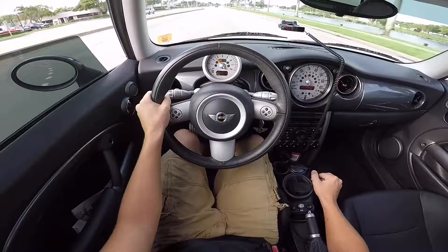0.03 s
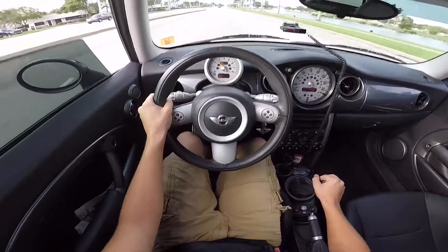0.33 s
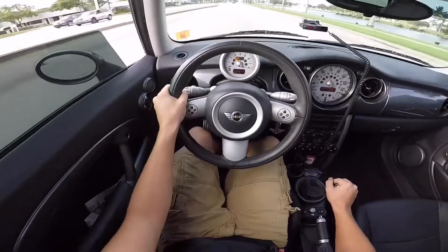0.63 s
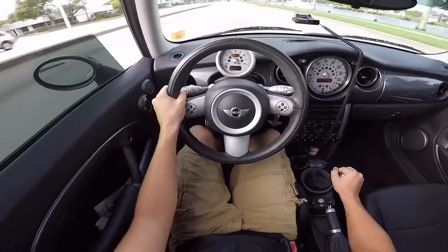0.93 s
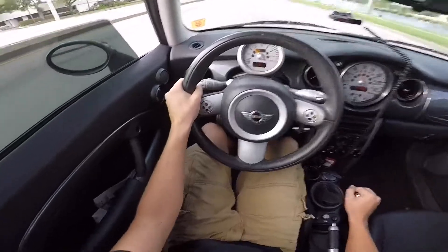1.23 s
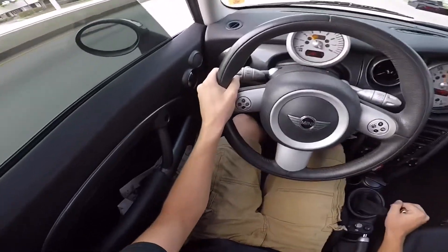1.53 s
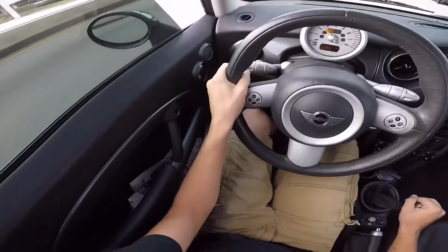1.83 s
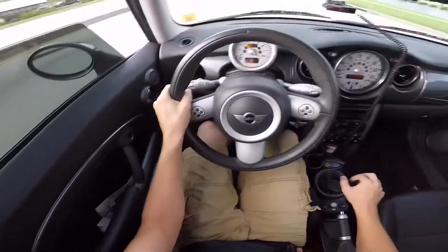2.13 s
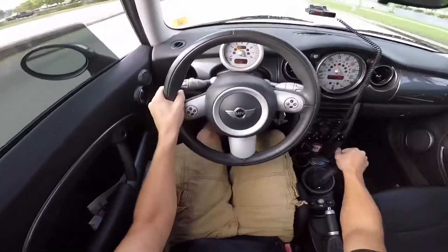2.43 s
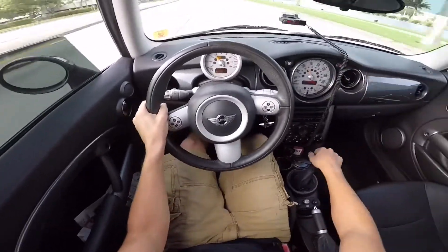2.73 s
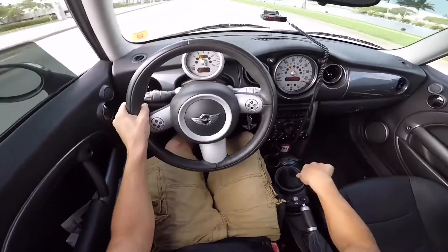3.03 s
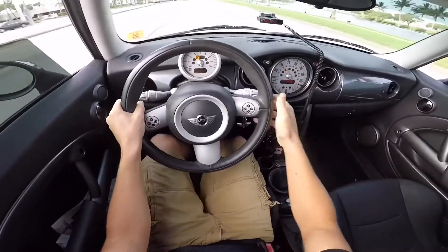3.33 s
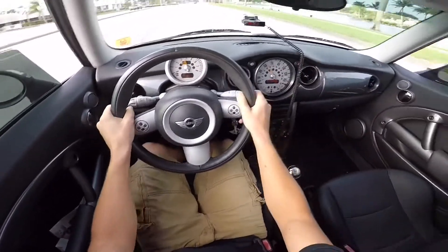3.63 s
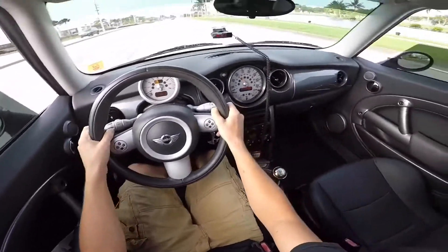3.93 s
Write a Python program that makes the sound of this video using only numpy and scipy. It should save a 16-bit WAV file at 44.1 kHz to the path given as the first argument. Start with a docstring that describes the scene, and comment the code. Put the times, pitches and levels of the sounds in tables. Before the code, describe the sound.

Heard inside the cabin, a car engine cruises with a faint whine and road noise. After light clicks from the controls, it rises in pitch in surges, with two dull knocks, ending in a booming, rasping exhaust.

```python
"""Inside a small four-cylinder car.

The periodic firing of the engine drives a harmonic series through the exhaust: a drone over
road rumble, tyre roar and wind. The engine picks up, eases off twice, then pulls with a deep
boom and a rasp on every firing. The transmission whines faintly while cruising, the controls
give a few small clicks, and two dull knocks sound as the load comes on and off."""
import sys
import numpy as np
from scipy import signal
from scipy.fft import rfft, irfft
from scipy.io import wavfile
from scipy.ndimage import uniform_filter1d, minimum_filter1d

SR = 44100
rng = np.random.default_rng(int(sys.argv[2]) if len(sys.argv) > 2 else 0)


def bounce(signal):
    """Save signal as a 16-bit WAV file at the path given by the first command-line argument."""
    frames = np.transpose(np.atleast_2d(signal))
    limited = np.clip(frames, -1, 1)
    pcm = np.round(limited * 32767).astype(np.int16)
    wavfile.write(sys.argv[1], SR, pcm)


N = 176400
T = np.arange(N) / SR

# Stereo balance of the engine sound. Each row: frequency in Hz, left minus right in dB.
ENGINE_PAN = [(85, 0.5), (122, 3.5), (165, 3.5), (250, 7), (300, 5), (490, 4), (620, 7), (740, 0.5),
              (870, -8), (1400, -5), (2000, -1.5), (3000, -1.5)]


def exhaust_boom(firings, firing_hz):
    """Forced vibration: the lowest firing harmonics swell as they cross cabin resonances."""
    # Boom in the cabin. Each row: time in seconds, levels of harmonics 1 to 4 in dB.
    harmonic_levels = [(0.25, -22.5, -22, -31, -25.5), (0.55, -33, -20.5, -19.5, -30.5),
                       (0.8, -22, -16.5, -21.5, -29.5), (1.1, -44, -20, -20.5, -26.5),
                       (1.7, -35, -17.5, -28, -24.5), (2.1, -23, -15.5, -24, -20.5),
                       (2.38, -56, -22, -29, -29), (2.5, -15.5, -21.5, -14, -31),
                       (2.7, -19.5, -19, -8.5, -33), (2.87, -32.5, -14, -20.5, -32),
                       (3, -15.5, -20.5, -10, -40), (3.12, -5.5, -57, -28, -19),
                       (3.27, -11.5, -26.5, -23, -34.5), (3.4, -10, -34, -49, -25),
                       (3.52, -10, -21, -36.5, -16.5), (3.7, -8, -20.5, -34, -15.5),
                       (3.87, -12, -15, -32, -18.5), (4, -12, -16.5, -26, -23)]
    # Tones of unequal cylinders. Each row: multiple of the crank rate, relative level in dB.
    crank_orders = [(3, -38.5), (5, -33.5), (7, -38.5), (10, -42.5)]
    # Unevenness, strongest at light load. Each row: time in seconds, gain in dB.
    unevenness = [(.15, 1), (2.1, 3.5), (2.45, 8), (2.7, -4), (3.05, -2.5), (4, -27)]
    uneven, out = amp(curve(unevenness)), 0
    for k in range(1, 5):
        waver = 1 + .05 * uneven * (drift(hz=15) + 1j * drift(hz=15))
        wave = waver * np.exp(2j * np.pi * k * firings)
        out += pan_tone(amp(curve(harmonic_levels, column=k)) * wave, k * firing_hz)
    crank_turns, crank_hz = firings / 2, firing_hz / 2  # two firings per revolution
    for order, db in crank_orders:
        waver = 1 + .94 * (drift(hz=12) + 1j * drift(hz=34))
        wave = waver * np.exp(2j * np.pi * (order * crank_turns + rng.random()))
        out += pan_tone(amp(db) * uneven * wave, order * crank_hz)
    return out


def exhaust_buzz(firings, firing_hz):
    """Superposition: upper harmonics leave the pipe loosely in phase, so each firing stands out."""
    # Pipe spectrum at full speed and 0 dB load. Each row: frequency in Hz, harmonic level in dB.
    pipe_spectrum = [(430, -27.5), (530, -20), (595, -36), (640, -37.5), (740, -29), (870, -32),
                     (1000, -37.5), (1100, -38.5), (1220, -37), (1350, -31), (1480, -36), (1600, -33),
                     (1720, -38), (1830, -47), (1960, -38), (2080, -44), (2200, -46), (2400, -55),
                     (3100, -50.5), (3400, -56), (4100, -50.5), (5000, -64)]
    # How hard the engine pulls. Each row: time in seconds, gain in dB.
    load = [(.15, -23.5), (2.42, -19), (2.52, -2.5), (2.62, -2), (2.72, -2.5), (2.88, -14), (2.98, -7),
            (3.05, 1), (3.11, 5), (3.19, -2.5), (3.33, -20.5), (3.44, -4.5), (3.6, 3.3), (3.8, 3.5), (4, 2)]
    # Roughness of the harmonics. Each row: time in seconds, random part of the amplitude, 0 to 1.
    roughness = [(.15, .7), (2.4, .55), (2.6, .3), (3.1, .35), (3.3, .45), (3.5, .1), (4, .1)]
    full_speed_hz, dull_above_hz, scatter_cycles = 121, 1000, .65
    speed_lost = np.clip(1 - firing_hz / full_speed_hz, 0, .1)
    dull_db_per_octave = 50 * speed_lost
    rough, out = curve(roughness), 0
    for k in range(5, 36):
        hz = k * firing_hz
        waver = np.sqrt(1 - rough ** 2) + rough * (drift(hz=27) + 1j * drift(hz=21)) / np.sqrt(2)
        octaves_above = np.log2(np.maximum(hz / dull_above_hz, 1))
        gain = amp(at_hz(pipe_spectrum, hz) - dull_db_per_octave * octaves_above)
        wave = np.exp(2j * np.pi * (k * firings + scatter_cycles * rng.random()))
        out += pan_tone(gain * waver * wave, hz)
    return out * amp(curve(load))


def exhaust_gas(firings):
    """Amplitude modulation: a puff at each firing pulses a growl, a rasp and thin metallic rings."""
    # Gas noise, mid growl and treble rasp. Each row: frequency in Hz, relative density in dB.
    growl_spectrum = [(100, -23.5), (250, -19.5), (450, 8.5), (800, 4), (1400, 6), (1900, -11),
                      (2600, -21.5), (5000, -55)]
    rasp_spectrum = [(1000, -15.5), (1900, -2), (2400, -9), (3100, -4.5), (3350, -5), (3800, -5),
                     (4200, -4.5), (4600, -8.5), (6200, -12.5), (8000, -22.5), (10000, -36.5), (12600, -49)]
    # Their strength. Each row: time in seconds, level in dB.
    growl_level = [(.15, -44), (.9, -34), (1.4, -46.5), (2.4, -30), (2.52, -23), (2.7, -53), (2.95, -51),
                   (3.03, -22), (3.085, -18.5), (3.15, -19), (3.2, -27.5), (3.35, -32), (3.6, -27),
                   (4, -33)]
    rasp_level = [(.15, -44), (2.44, -43), (2.52, -32.5), (2.62, -34.5), (2.72, -45), (2.96, -46.5),
                  (3.04, -29.5), (3.15, -29), (3.24, -42.5), (3.38, -57), (3.52, -36.5), (3.6, -28),
                  (3.75, -27.5), (4, -30)]
    # Metal resonances that sing under load. Each row: peak time in seconds, 1/e half-width in
    # seconds, frequency in Hz, level in dB.
    rings = [(3.09, .09, 2700, -42), (3.53, .09, 2690, -40), (3.64, .09, 3855, -37), (3.63, .08, 4135, -37),
             (3.71, .09, 4250, -38.5), (3.88, .075, 3095, -34), (3.95, .05, 2740, -40.5)]
    steady_flow, decay_cycles = 1, .45
    flutter_hz, flutter_db, ring_wander_hz = 15.2, 1.1, 14
    puffs = unit_rms(steady_flow + np.exp(-(firings % 1) / decay_cycles))
    growl = noise(growl_spectrum, coherence=[(300, .66), (1200, .057)], pan=ENGINE_PAN, gate=puffs)
    flutter = amp(flutter_db * np.sin(2 * np.pi * flutter_hz * T + .6 * drift(hz=2.4)))
    rasp = noise(rasp_spectrum, coherence=[(2000, .88), (4000, .45), (7000, .1)], gate=puffs * flutter)
    out = growl * amp(curve(growl_level)) + rasp * amp(curve(rasp_level))
    for peak_s, width_s, hz, db in rings:
        cycles = np.cumsum(hz + ring_wander_hz * drift(hz=70)) / SR
        swell = amp(db) * np.exp(-((T - peak_s) / width_s) ** 2)
        out += pan_tone(swell * puffs * flutter * np.exp(2j * np.pi * cycles), hz)
    return out


def road_and_wind():
    """Random excitation: the road shakes the body, the tyres roar, their tread sings, wind hisses."""
    # Spectra of the four noises. Each row: frequency in Hz, relative density in dB.
    rumble_spectrum = [(8, -44.5), (18, -9), (26, 3), (37, 6.5), (52, -0.5), (70, -5.5), (110, -25),
                       (300, -78.5)]
    roar_spectrum = [(20, -15), (60, -14.5), (110, 5), (230, 1.5), (300, 1.5), (370, -7), (500, -6),
                     (640, -12), (900, -9.5), (1300, -12.5), (1700, -16.5), (2400, -27), (4000, -60.5)]
    tread_spectrum = [(700, -27.5), (1030, 0.5), (1120, -6.5), (1240, 6.5), (1380, -15), (1900, -50.5)]
    wind_spectrum = [(1200, -20.5), (2400, 5), (4000, -1), (6400, -1), (8000, -9.5), (10000, -23),
                     (12600, -42)]
    # Their strength. Each row: time in seconds, level in dB.
    rumble_level = [(.15, -17), (.95, -15), (1.08, -12.5), (1.25, -15), (2, -17.5), (2.3, -14), (2.6, -19),
                    (3, -19), (3.2, -24), (3.5, -27.5), (4, -32)]
    roar_level = [(.15, -17.5), (2, -17.5), (2.35, -17), (2.55, -21), (2.85, -19.5), (3.1, -21.5),
                  (3.35, -25.5), (4, -26)]
    tread_level = [(.15, -34), (1, -32), (1.6, -47), (3, -49)]
    wind_level = [(.15, -38), (2.45, -39), (2.8, -42.5), (3.35, -44.5)]
    # Sound field of tyres and wind. Each row: frequency in Hz, left-right coherence from 0 to 1.
    coherence = [(60, .94), (130, .98), (300, .95), (600, .5), (1200, .2), (2600, .35), (5600, .22),
                 (11000, 0)]
    # Its balance. Each row: frequency in Hz, left minus right in dB.
    pan = [(60, -5), (110, 7), (190, 5), (350, 5), (630, 2.5), (1140, -5.5), (2060, 1), (3700, -3),
           (6700, 1)]
    # Its phase difference. Each row: frequency in Hz, lead of the left side in radians.
    lead = [(30, 0), (300, -.2), (600, -.9), (1200, -3.6), (1750, -5.2), (2800, -6.2), (6000, -6)]
    rumble = noise(rumble_spectrum, coherence=[(30, .89)]) * amp(curve(rumble_level))
    roar = noise(roar_spectrum, coherence, pan, lead) * amp(curve(roar_level))
    tread = noise(tread_spectrum, coherence, pan, lead) * amp(curve(tread_level))
    wind = noise(wind_spectrum, coherence, pan, lead) * amp(curve(wind_level))
    flicker = amp(.5 * drift(hz=11) + .76 * drift(hz=130))
    return rumble + (roar + tread + wind) * flicker


def clicks_and_knocks():
    """Damped impacts: exponentially decaying noise bursts take the colour of the body struck."""
    # Clicks of the controls and knocks as the load comes on and off.
    # Each row: start in seconds, level in dB, time to fall 60 dB in seconds.
    clicks = [(2.149, -28, 0.099), (2.163, -30, 0.054), (2.36, -27, 0.07), (2.886, -30, 0.11),
              (3.319, -29, 0.089)]
    knocks = [(2.477, -23.5, 0.099), (2.805, -24, 0.026)]
    # Responses of the bright plastic and the dull body. Each row: frequency in Hz, relative gain in dB.
    click_body = [(800, -19), (2000, -8), (2800, 4.5), (3100, -7), (3500, 4), (4600, -3), (5300, -0.5),
                  (5800, -3.5), (7000, -9), (9000, -28), (12600, -42)]
    knock_body = [(150, -19), (570, 4.5), (900, -7.5), (1500, -13), (3000, -25.5), (9000, -47)]
    out = 0
    for impacts, body in (clicks, click_body), (knocks, knock_body):
        envelope = 0
        for start, db, t60 in impacts:
            envelope += (T >= start) * amp(db - 60 * np.maximum(T - start, 0) / t60)
        rms = np.sqrt(np.mean(envelope ** 2))
        out += rms * noise(body, coherence=[(3000, .63)], gate=envelope)
    return out


def transmission_whine(firings, firing_hz, ratio=7):
    """Synchronous vibration: a thin tone keeps a constant ratio to the firing rate."""
    # Strength of the whine. Each row: time in seconds, level in dB.
    whine_level = [(.15, -37), (.7, -37.5), (1.3, -42), (2.3, -56)]
    wave = np.exp(2j * np.pi * ratio * firings)
    return pan_tone(amp(curve(whine_level)) * wave, ratio * firing_hz)


def pan_tone(wave, hz):
    """Interaural differences: a complex tone takes a level and phase on each side by its frequency."""
    # Phase difference of the engine tones. Each row: frequency in Hz, lead of the left in radians.
    lead = [(100, .27), (170, .05), (250, -.3), (330, -.3), (490, -1.2), (610, -2.1), (740, -1.3),
            (870, -2.2), (1500, -1.6), (2500, -.5), (4000, -.3)]
    side = amp(at_hz(ENGINE_PAN, hz) / 2) * np.exp(.5j * at_hz(lead, hz))
    return np.sqrt(2) * np.array([(wave * side).real, (wave / side).real])


def noise(spectrum, coherence, pan=((1, 0),), lead=((1, 0),), gate=1):
    """Partial coherence: two gated noises mix and filter to stereo of rms 1; tables run over Hz."""
    hz = np.fft.rfftfreq(N, 1 / SR)
    left, independent = rfft(gate * rng.standard_normal((2, N)))
    shared = at_hz(coherence, hz)
    right = shared * left + np.sqrt(1 - shared ** 2) * independent
    right *= np.exp(-1j * at_hz(lead, hz))
    tilt = amp(at_hz(pan, hz) / 2)
    stereo = np.array([left * tilt, right / tilt])
    return unit_rms(irfft(stereo * amp(at_hz(spectrum, hz)), N))


def drift(hz):
    """Low-pass noise: a random fluctuation of rms 1, with rates up to about hz."""
    low_pass = np.exp(-(np.fft.rfftfreq(N, 1 / SR) / hz) ** 2)
    return unit_rms(irfft(rfft(rng.standard_normal(N)) * low_pass, N))


def curve(rows, column=1):
    """Linear interpolation of one column of a time table at every sample."""
    rows = np.array(rows)
    return np.interp(T, rows[:, 0], rows[:, column])


def at_hz(rows, hz):
    """Interpolation of a table on a logarithmic frequency axis."""
    row_hz, values = np.transpose(rows)
    return np.interp(np.log(hz + 1), np.log(row_hz + 1), values)


def amp(db):
    """Decibels to amplitude ratio."""
    return 10 ** (np.asarray(db) / 20)


def unit_rms(x):
    """Normalisation to rms 1."""
    return x / np.sqrt(np.mean(abs(x) ** 2) + 1e-20)


def scene():
    """Superposition at the driver's head: engine sounds sharing one firing phase, road and impacts."""
    # Engine speed. Each row: time in seconds, firings per second.
    speed = [(0, 83.3), (0.7, 83.1), (1.5, 82.4), (2, 82.3), (2.25, 80.9), (2.37, 81.5), (2.45, 85.7),
             (2.53, 89.4), (2.68, 96.8), (2.78, 98), (2.9, 98.2), (2.98, 101.4), (3.13, 111.7),
             (3.23, 115.7), (3.41, 121), (3.63, 121.3), (3.87, 123.9), (4, 125.1)]
    jitter = 1 + .0006 * drift(hz=23)
    firing_hz = uniform_filter1d(curve(speed), size=2000) * jitter
    firings = np.cumsum(firing_hz) / SR  # phase in firing cycles
    drone = exhaust_boom(firings, firing_hz) + exhaust_buzz(firings, firing_hz)
    engine = drone + transmission_whine(firings, firing_hz) + exhaust_gas(firings)
    return engine + road_and_wind() + clicks_and_knocks()


def record(dry):
    """Peak and band limiting: after a quick fade-in, a smooth gain holds peaks down before a low-pass."""
    start_s, fade_s = .12, .067
    ceiling, smoothing_s, cutoff_hz = .93, .012, 12700
    faded = dry * np.clip((T - start_s) / fade_s, 0, 1)
    span = round(smoothing_s * SR)
    peak = abs(faded).max(0)
    allowed_gain = minimum_filter1d(ceiling / np.maximum(peak, ceiling), 2 * span)
    gain = uniform_filter1d(uniform_filter1d(allowed_gain, span), span)
    low_pass = signal.firwin(511, cutoff_hz, window=("kaiser", 9), fs=SR)
    return signal.oaconvolve(faded * gain, low_pass[None], "same")


dry = scene()
out = record(dry)
bounce(out)
```